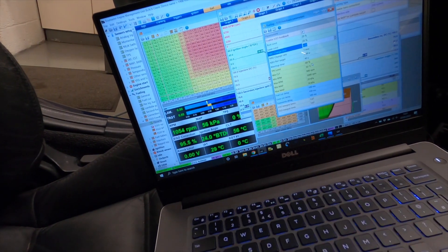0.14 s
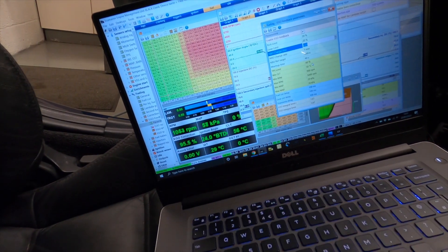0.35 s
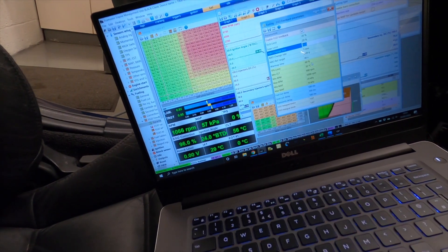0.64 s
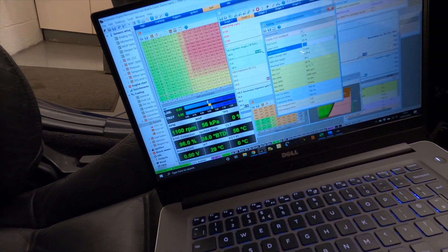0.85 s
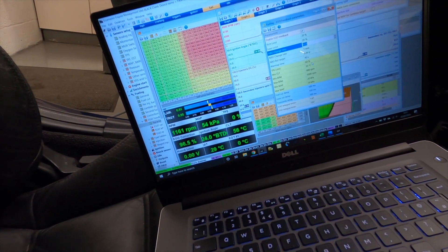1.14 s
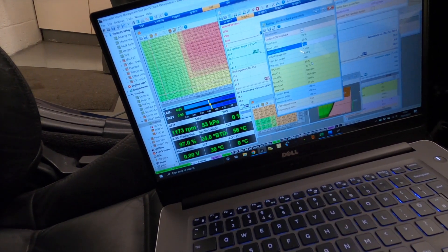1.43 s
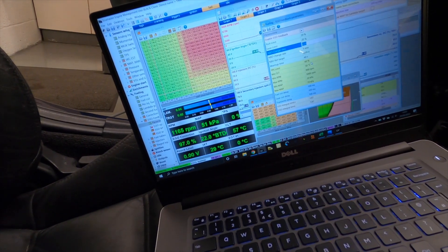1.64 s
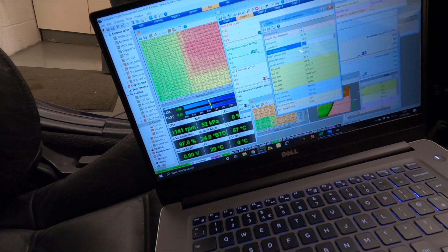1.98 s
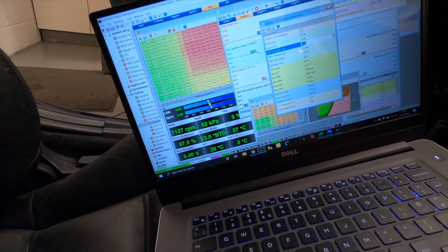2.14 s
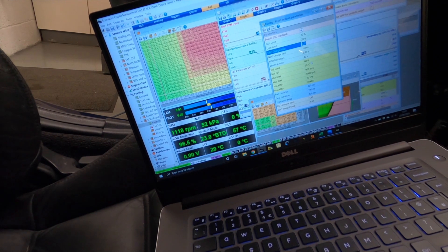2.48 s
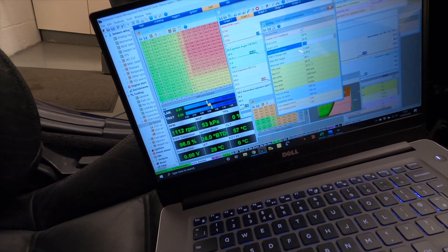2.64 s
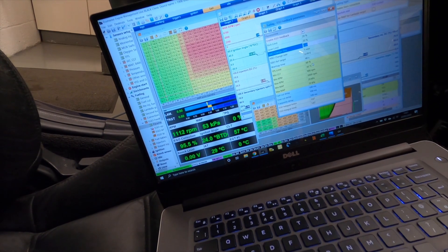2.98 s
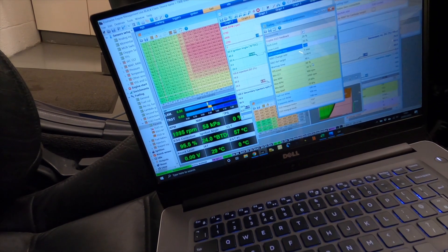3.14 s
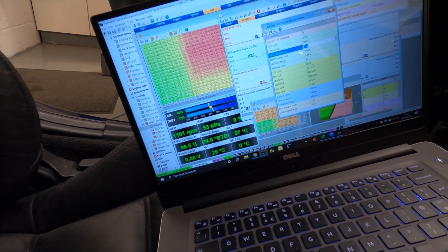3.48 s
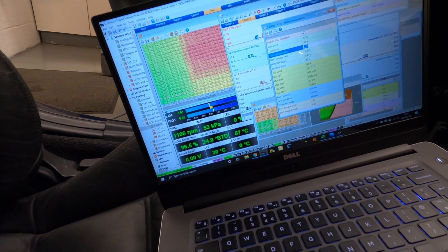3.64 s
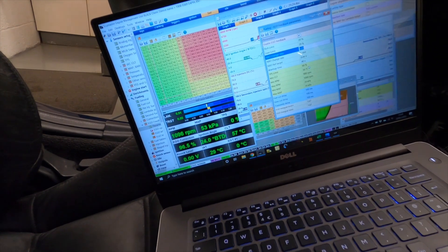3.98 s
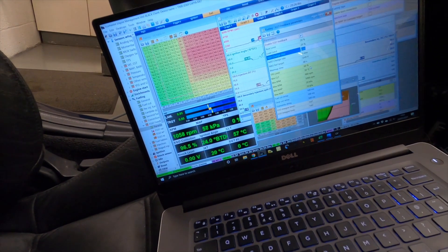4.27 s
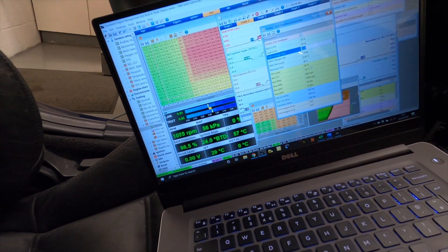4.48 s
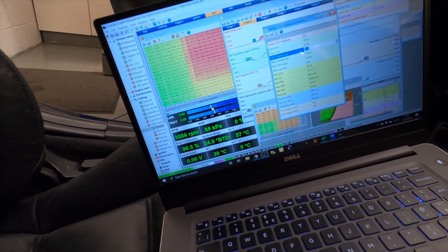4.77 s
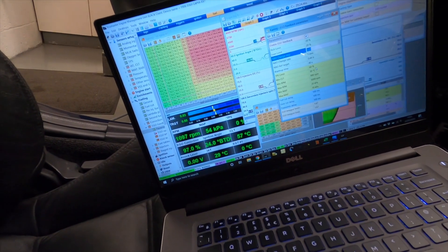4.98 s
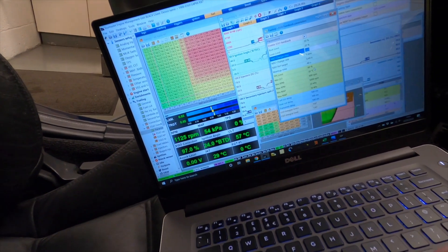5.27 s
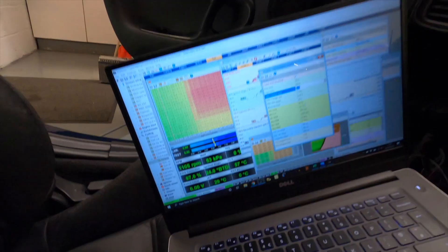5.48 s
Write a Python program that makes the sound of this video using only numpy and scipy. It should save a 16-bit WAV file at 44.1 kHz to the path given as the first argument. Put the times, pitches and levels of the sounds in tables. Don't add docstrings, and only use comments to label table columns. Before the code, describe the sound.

Low pulsing car engine idle heard from the seat, hunting gently and stumbling once, with steady fan hiss and occasional light plastic key clicks.

```python
import sys
import numpy as np
from scipy import signal
from scipy.fft import rfft, irfft, next_fast_len
from scipy.io import wavfile
from scipy.ndimage import uniform_filter1d, map_coordinates

SR = 44100
rng = np.random.default_rng(int(sys.argv[2]) if len(sys.argv) > 2 else 0)


def materialize(psi):
    bounded = np.clip(np.atleast_2d(psi).T, -1, 1)
    quanta = np.round(bounded * 32767).astype(np.int16)
    wavfile.write(sys.argv[1], SR, quanta)


def field_ratio(decibels):
    return 10 ** (np.asarray(decibels, dtype=float) / 20)


N = 247842


def unit(x):
    return x / np.sqrt(np.mean(x ** 2) + 1e-20)


def along(points, hz):
    f, v = np.transpose(points)
    return np.interp(np.log(hz + 1), np.log(f + 1), v)


def curves(rows):
    s, *columns = np.transpose(rows)
    return [np.interp(np.arange(N) / SR, s, column) for column in columns]


def wobble(rate):
    knots = rng.standard_normal(int(N * rate / SR) + 4)
    return map_coordinates(knots, [np.arange(N) * rate / SR])


def filtered(x, response):
    m = next_fast_len(N + SR)
    spectrum = rfft(x, m) * response(np.fft.rfftfreq(m, 1 / SR))
    return irfft(spectrum, m)[..., :x.shape[-1]]


def resonance(f, centre, width):
    return 1j * f * width / (centre * centre - f * f + 1j * f * width)


def ringing(modes):
    def response(f):
        return sum((-1) ** k * field_ratio(db) * resonance(f, hz, width) for k, (hz, width, db) in enumerate(modes))
    return response


# time in seconds, shaft turns a second.
SHAFT = [(0.0, 17.376), (0.4, 17.821), (0.8, 18.824), (1.0, 19.445), (1.4, 19.626), (2.0, 18.791),
         (2.2, 18.811), (2.6, 18.665), (2.8, 18.475), (3.2, 18.437), (3.6, 18.227), (3.75, 18.448),
         (3.85, 17.376), (3.95, 16.815), (4.05, 17.565), (5.0, 18.73), (5.62, 18.292)]
# time in seconds, combustion in dB, weakness of the rear rotor 0-1.
LOAD = [(0, -1, 0.08), (.3, -3, .08), (.55, -4.5, 0.1), (.85, 0.5, 0.08), (1.1, -1.5, 0.18),
        (1.4, -2.4, 0.23), (1.85, 1.5, 0.1), (2.55, 0.7, 0.17), (2.8, -1.4, .18), (3.35, -1.6, 0.25),
        (3.65, -4, .14), (4.05, 6, 0.18), (4.15, -2, 0.17), (4.45, -4.5, 0.08), (4.7, -2, .22),
        (5.15, 0, 0.12), (5.4, -1.5, 0.26), (5.62, -4, 0)]
# time in seconds, strength left 0-1, lateness in ms.
MISFIRES = [
    (1.653, 0.6, 1.5),
    (1.968, 0.41, 0.87),
    (2.287, 0.55, 0.55),
    (3.776, 0.25, -2.3),
    (3.846, 0.97, 0.43),
    (3.889, 0.41, -1.47),
    (3.977, 0.42, -0.53),
    (5.403, 0.8, 0.54),
    (5.567, 0.48, 1.7),
]


def firings(turns):
    load_db, weak = curves(LOAD)
    firing = np.arange(np.ceil(2 * turns[0]) - 8, 2 * turns[-1])
    rear = firing % 2
    chance = rng.standard_normal((len(firing), 2))
    place = firing / 2 + .0026 * rear + .0005 * chance[:, 0]
    second_before = turns[0] - SHAFT[0][1]
    at = np.interp(place, np.r_[second_before, turns], np.r_[-SR, np.arange(N)])
    now = np.clip(at, 0, N - 1).astype(int)
    size = field_ratio(load_db[now] + 0.12 * chance[:, 1]) * (1 - weak[now] * rear)
    for s, left, late_ms in MISFIRES:
        poor = np.argmin(abs(at - s * SR))
        size[poor] *= left
        recovery = np.exp(-(at[poor + 1:] - at[poor]) / (.12 * SR))
        size[poor + 1:] *= 1 - (1 - left) * recovery
        at[poor] += late_ms * SR / 1000
    stumble_s, half_s, drag_ms = 3.895, 0.063, 3
    at = at + drag_ms * SR / 1000 * np.exp(-((at / SR - stumble_s) / half_s) ** 2)
    return at, size, rear, now


def struck(at, size, response):
    before = SR // 4
    pulses = np.bincount(at.round().astype(int) + before, size, N + SR)
    return unit(filtered(pulses, response)[before:before + N])


# centre in Hz, width in Hz, level in dB, push +1 or pull -1 at the seat.
CABIN = [(45.9, 8.7, -4.7, 1), (57.3, 15.7, 0, -1), (63.7, 4.3, 0, 1), (71, 3, -10.9, -1),
         (73.7, 4.9, -11.5, 1), (93.5, 9.8, -10.8, 1), (116.4, 9.4, -17.9, 1), (151, 12.3, -24.3, 1),
         (159.3, 4.1, -10.3, 1), (179.8, 5.3, -22.1, -1), (194.9, 4.2, -33.6, 1), (208.4, 3, -35, 1)]


def cabin(f):
    highpass = (1j * f / (1j * f + 15)) ** 3
    lowpass = 1 / (1 + (f / 222) ** 14)
    return highpass * lowpass * sum(side * field_ratio(db) * resonance(f, hz, width) for hz, width, db, side in CABIN)


# centre in Hz, width in Hz, level in dB.
PIPE = [(211.7, 14.6, 9.5), (233.7, 42, -3.5), (254, 17, -1), (285, 5.7, 5.5), (319.4, 5, -5.5),
        (355, 14, 0.5), (384.5, 5.8, 0.5), (430, 5.2, 0), (461.8, 12.2, -2), (494, 4.8, -8),
        (514.3, 5.2, -0.5), (551, 3.3, -0.5), (576, 4.7, -22), (619.4, 8.2, -7), (650, 5.2, -1),
        (672, 5.2, -11.5)]
# centre in Hz, width in Hz, level in dB.
BARK = [(333.4, 133, 0), (520, 164, -2.5)]


def tailpipe(at, size, rear, now):
    rear_path_ms, db_per_flow_db, load_power = .12, 1.05, .35
    flow_db = curves(FLOW)[0][now] - FLOW[0][1]
    breath = field_ratio(db_per_flow_db * flow_db) * np.abs(size) ** load_power
    arrival = at + rear * rear_path_ms * SR / 1000
    rasp = struck(arrival, breath, ringing(PIPE))
    bark = struck(arrival, breath, lambda f: ringing(BARK)(f) ** 2)
    return field_ratio(-35.5) * rasp + field_ratio(-42) * bark


# centre in Hz, width in Hz, level in dB.
MOUNTS = [(132, 17, 1.5), (204.1, 10, 4.5)]


def exhaust(turns):
    at, size, rear, now = firings(turns)
    boom = struck(at, size, cabin)
    mounts = struck(at, size * (1 - rear), ringing(MOUNTS))
    return field_ratio(-13) * boom + tailpipe(at, size, rear, now) + field_ratio(-39) * mounts


# frequency in Hz, left-right likeness 0-1.
ALIKE = [(60, 0.95), (130, 1), (290, 0.93), (630, 0.66), (1370, 0.85), (2980, 0.55), (6520, 0.17),
         (14200, 0.01)]


def rush(colour, patchy_db):
    z = signal.stft(rng.standard_normal((2, N)), nperseg=512)[2]
    field = uniform_filter1d(rng.standard_normal(z.shape[1:]), size=6, axis=0)
    field = uniform_filter1d(field, size=10, axis=1)
    pair = signal.istft(z * field_ratio(patchy_db * unit(field)), nperseg=512)[1][:, :N]

    def mid_side(hz):
        angle = np.arccos(np.clip(along(ALIKE, hz), -1, 1)) / 2
        return colour(hz) * np.array([np.cos(angle), np.sin(angle)])
    mid, side = filtered(pair, mid_side)
    return unit(np.array([mid + side, mid - side]))


# time in seconds, hiss level in dB.
FLOW = [(0.0, -36.5), (0.34, -35), (0.86, -37), (1.56, -36.5), (2.07, -38), (4.02, -37.5), (4.24, -35.5),
        (5.26, -37.5), (5.62, -38)]
# frequency in Hz, level in dB per Hz.
HISS = [(150, -17.5), (230, -10), (330, -13), (640, -19.5), (717, -26), (1210, -20), (1530, -28),
        (2150, -24.5), (2570, -31), (3020, -27.5), (6660, -32), (7550, -32.5), (12300, -45.5), (14700, -58)]
# centre in Hz, width in Hz, level in dB.
PANELS = [(844, 15, -18.5), (970, 22, -17.5), (1205, 52, -8), (1470, 8.5, 6.5), (1530, 17, -3.5),
          (1633, 20, 4), (1794, 10, 5.5), (2020, 40, 1), (2280, 10, 4), (2387, 8.3, 3)]
# frequency in Hz, level in dB per Hz.
RUMBLE = [(25, -60), (45, -38), (60, -4), (95, 7), (130, 26), (200, 33), (240, -7), (300, -45)]


def air():
    def colour(f):
        octaves = np.log2((f + 1) / 430)
        dip_db = -4 * np.exp(-(octaves / .6) ** 2)
        return field_ratio(along(HISS, f) + dip_db) * abs(1 + abs(ringing(PANELS)(f)))
    flutter_db = .6 * wobble(12)
    hiss = field_ratio(curves(FLOW)[0] + 4.0 + flutter_db) * rush(colour, patchy_db=0.5)
    rumble = rush(lambda f: field_ratio(along(RUMBLE, f)), patchy_db=-1.0)
    return hiss + field_ratio(-36) * rumble


# centre in Hz, width in Hz, level in dB.
BUZZ = [(5000, 110, -7), (5830, 90, -8), (7120, 60, -5), (7390, 60, 1), (7610, 35, 0), (7730, 35, 0)]
# centre in Hz, width in Hz, level in dB.
WHINE = [(2975, 70, -1), (3800, 40, -6), (4757, 40, 0), (5860, 90, -4)]
# time in seconds, peak in dB, length in seconds.
JOLTS = [(0.246, -43, 0.051), (0.32, -43, 0.033), (.38, -47, .03), (.6, -58, 0.045), (0.758, -45, 0.015),
         (0.833, -40.5, 0.037), (0.92, -46, .02), (1.445, -45, .03), (2.23, -44, 0.014), (2.71, -42, 0.013),
         (2.93, -43.5, 0.048), (3.356, -42.5, 0.045), (3.5, -57, 0.025), (3.655, -46, .04),
         (4.05, -42, 0.033), (4.28, -54, 0.12), (4.38, -54, 0.033), (4.634, -39, .04), (4.914, -50, 0.045),
         (5.19, -47, 0.032)]


def rattles(turns):
    flow_db = curves(FLOW)[0]
    flow_db = flow_db - flow_db.mean()
    t = np.arange(N) / SR
    bursts = sum(field_ratio(db) * np.exp(-((t - s) / long) ** 2) for s, db, long in JOLTS)
    shake = np.sin(2 * np.pi * turns)
    buzz = field_ratio(4.5 * shake + 1.8 * wobble(25)) * rush(ringing(BUZZ), patchy_db=2.5)
    whine = field_ratio(1.5 * wobble(5)) * rush(ringing(WHINE), patchy_db=2)
    buzz_level = np.hypot(field_ratio(-54 + 4.7 * flow_db), bursts)
    whine_level = field_ratio(-48.5 + 1.2 * flow_db)
    return buzz_level * unit(buzz) + whine_level * unit(whine)


# time in seconds, peak in dB.
KEYS = [
    (0.0832, -15),
    (0.4422, -17),
    (2.5554, -19.5),
    (4.0514, -22.5),
    (5.0614, -23),
    (5.494, -21),
]
# lateness in seconds, ring in dB, crack in dB.
PRESS = [
    (-.0012, -12, 5),
    (.001, 3, 1),
    (.0052, -6, -6),
    (.011, -12, -14),
]
# frequency in Hz, level in dB, 60 dB decay time in seconds.
KEYCAP = [(1100, -2, .04), (1290, -1, .04), (1500, -4, .04), (1750, -3, .04), (2040, -2, .055),
          (2160, -.5, .065), (2950, -3, .03), (3700, -5, .02), (4400, -6, .015)]


def keys():
    out, t = np.zeros(N + SR), np.arange(SR // 8) / SR
    for s, db in KEYS:
        for late, ring_db, crack_db in PRESS:
            ring = np.zeros(len(t))
            for hz, level, t60 in KEYCAP:
                mode_db = level + rng.normal(0, 1.6) - 60 * t / t60
                ring += field_ratio(mode_db) * np.sin(2 * np.pi * hz * t)
            crack_hz = rng.uniform(2200, 5000, len(t))
            crack = field_ratio(-60 * t / .007) * np.sin(2 * np.pi * np.cumsum(crack_hz) / SR)
            start = round((s + late) * SR)
            out[start:start + len(t)] += field_ratio(db - 15) * (field_ratio(ring_db) * ring + field_ratio(crack_db + 3) * crack)
    return filtered(out[:N], lambda f: 1 / (1 + 1j * f / 7500) ** 4)


def pump():
    hz = 296.1 + .8 * wobble(5)
    level_db = -41.5 + 3 + 1.2 * wobble(6)
    return field_ratio(level_db) * np.sin(2 * np.pi * np.cumsum(hz) / SR)


def scene():
    start_turn = 2.57
    turns = start_turn + np.cumsum(curves(SHAFT)[0]) / SR
    return exhaust(turns) + pump() + keys() + air() + rattles(turns)


def low_pass(x):
    return signal.sosfilt(signal.butter(12, 14840, fs=SR, output="sos"), x)


# frequency in Hz, left minus right in dB.
LEAN = [(60, -1.5), (110, -1.5), (200, 1.0), (370, 1.0), (680, 1.5), (1250, 2.5), (2300, 3.0), (4220, 2.0),
        (7750, 0.5), (14200, -1.0)]
# frequency in Hz, lead of the left in radians.
LEAD = [(60, 0.33), (260, 0.21), (1800, -0.63), (4400, -1.1), (6000, -0.04)]


def record(dry):
    def half(hz):
        return field_ratio(along(LEAN, hz) / 2) * np.exp(.5j * along(LEAD, hz))
    ports = filtered(dry, lambda hz: np.array([half(hz), 1 / half(hz)]))
    return low_pass(ports)


dry = scene()
out = record(dry)
materialize(out)
```